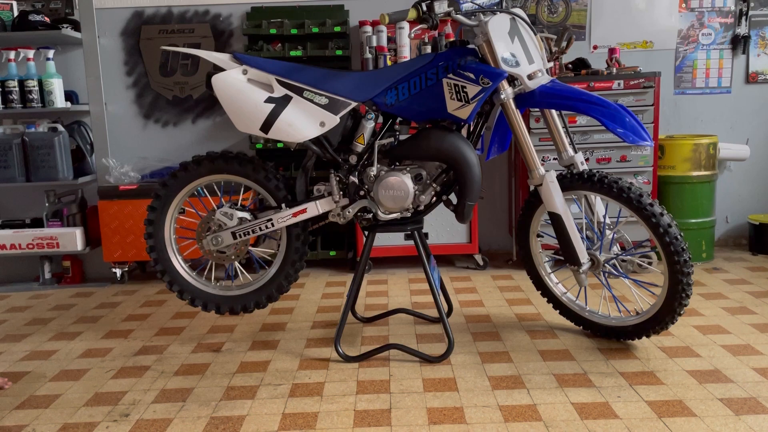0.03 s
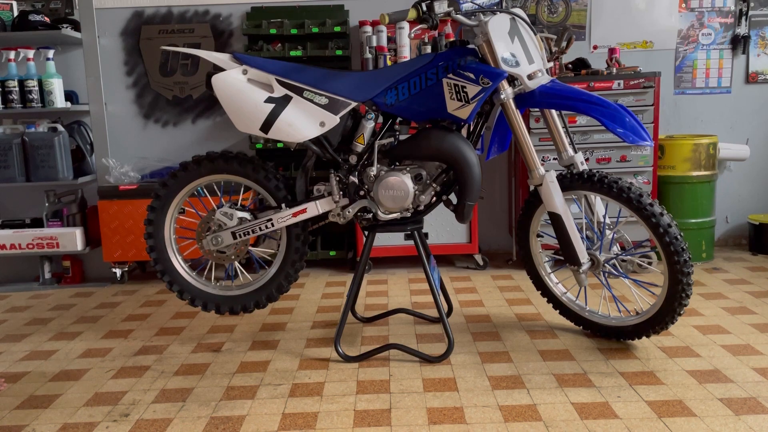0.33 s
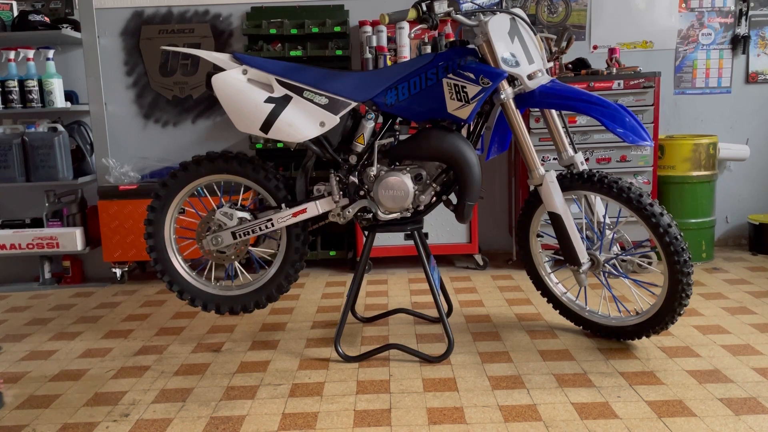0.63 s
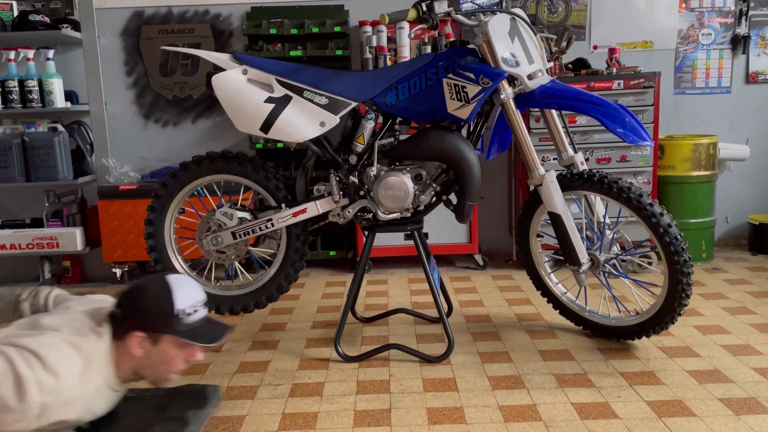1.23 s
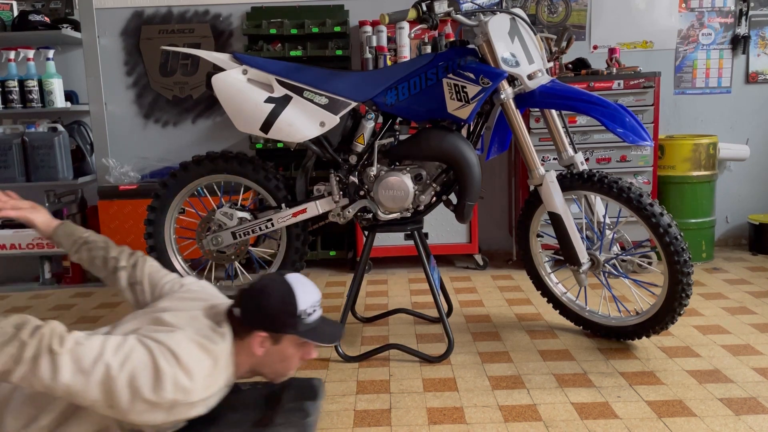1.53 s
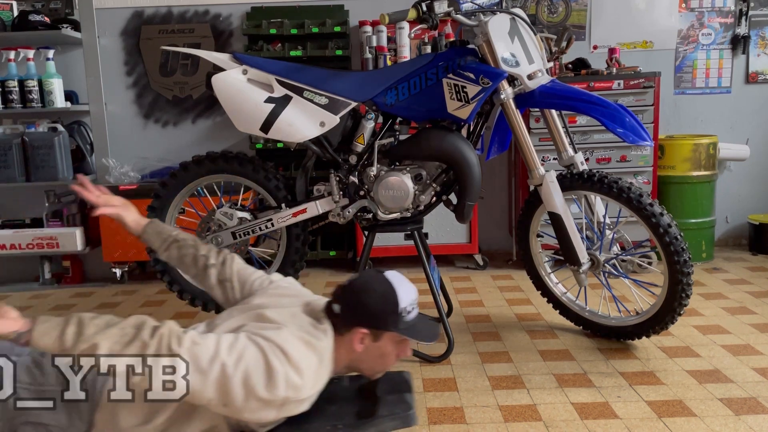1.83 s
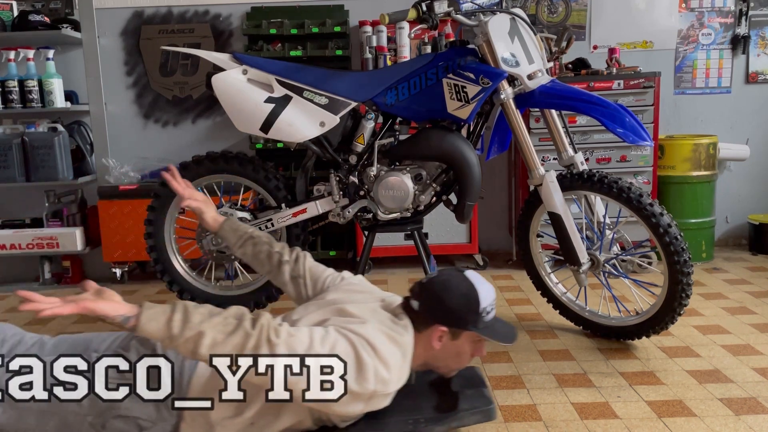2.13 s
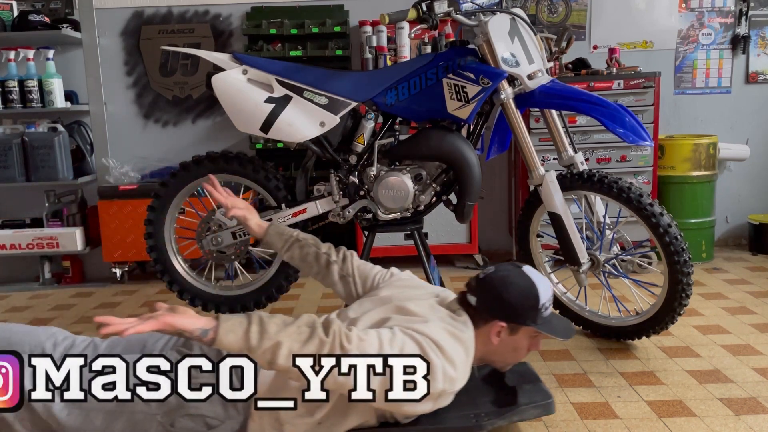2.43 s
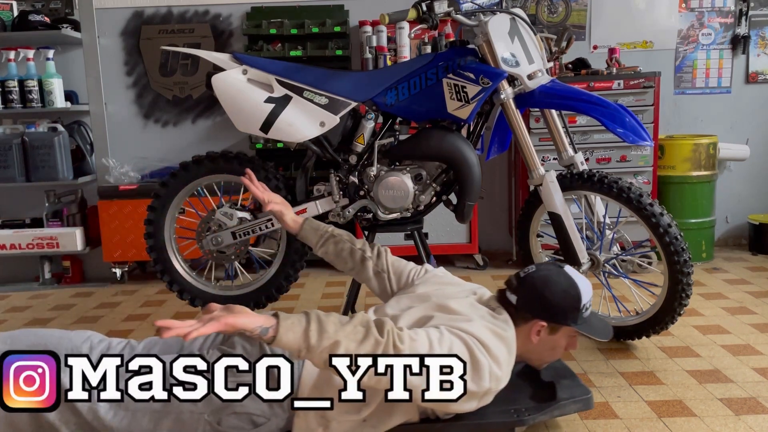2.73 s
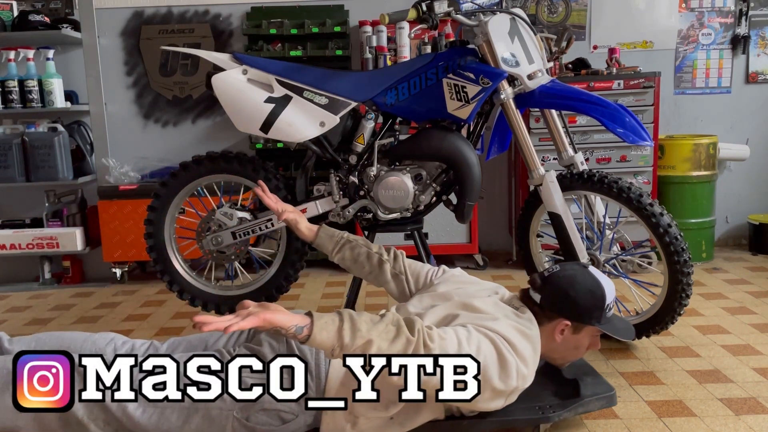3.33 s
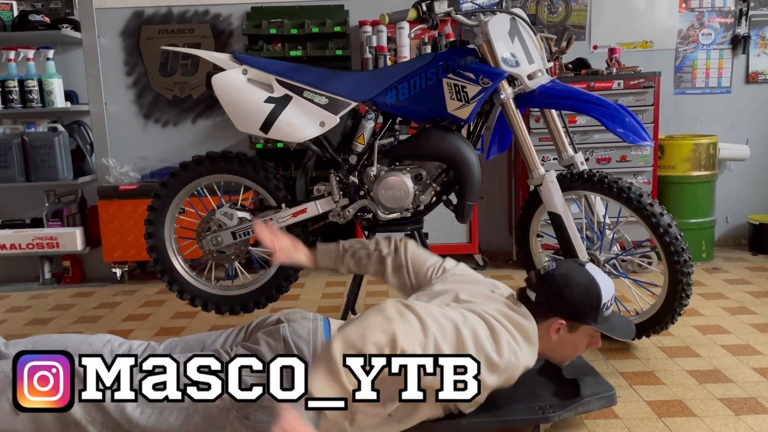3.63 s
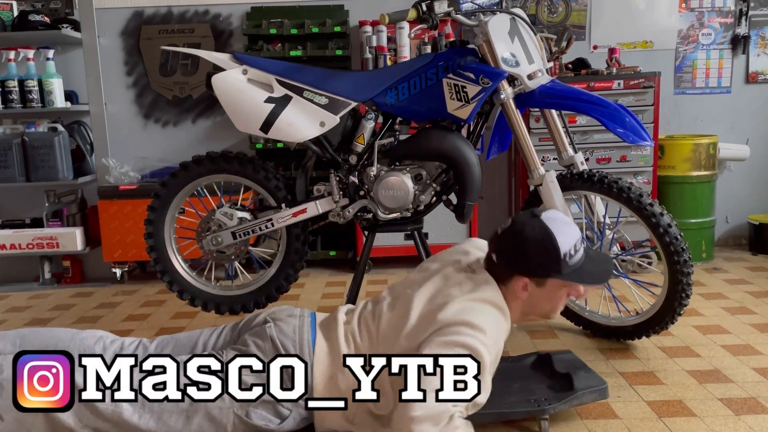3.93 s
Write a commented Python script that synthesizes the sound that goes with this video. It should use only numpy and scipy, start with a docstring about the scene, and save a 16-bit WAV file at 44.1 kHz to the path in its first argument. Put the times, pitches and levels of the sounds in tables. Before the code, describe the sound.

Small wheels rumble across a tiled garage floor, clicking and coasting to a stop.

```python
"""Small wheels rumble over a tiled garage floor: a mechanic's creeper, pushed off, coasts to a stop.
Floor roughness shakes the board, grit crackles and tile joints knock the wheels.
Loose casters tick, their bearings sizzle and the frame clinks.
Clothes rustle at the push, and again as the rider slaps a hand down on the floor."""
import sys
import numpy as np
from scipy import signal
from scipy.fft import rfft, irfft
from scipy.io import wavfile

SR = 44100
rng = np.random.default_rng(int(sys.argv[2]) if len(sys.argv) > 2 else 0)


def to_wav(sig):
    """Store sig (one row per channel, or 1-D mono) as 16-bit WAV at the path in sys.argv[1].

    Samples outside -1..1 are clipped; the rate is SR.
    """
    pcm = np.clip(np.atleast_2d(sig), -1, 1) * 32767
    pcm = np.round(pcm).astype(np.int16)
    wavfile.write(sys.argv[1], SR, pcm.T)  # frames by channels


N = 176400


def wheels():
    """Floor roughness shakes the board, which rings hollow under the push; grit crackles above."""
    roll_levels = [(0.15,-77,-85),(0.3,-61.5,-66),(0.375,-58,-66),(0.45,-41.5,-60.5),(0.53,-44,-61),(0.65,-33,-51.5),(0.85,-29.5,-42),(0.93,-29,-45),(1.03,-29.5,-42.5),(1.17,-30,-45.5),(1.33,-32,-47.5),(1.42,-32.5,-48.5),(1.62,-34,-49.5),(2.1,-40.5,-57.5),(2.39,-46.5,-63.5),(2.46,-46,-64),(2.56,-49.5,-63),(2.78,-57.5,-73),(2.94,-61.5,-76.5),(3.05,-74,-87),(3.2,-74,-95)]  # time_s, rumble_db, grit_db
    push_spectrum = [(40,-30),(75,-22),(105,-2.5),(135,1),(162,-12),(192,-2),(260,-4),(370,-2),(450,-1.5),(640,-6.5),(760,-3.5),(1000,-13),(1500,-21.5),(2200,-41.5),(3500,-96.5)]  # freq_hz, gain_db
    coast_spectrum = [(40,-26),(62,-7.5),(85,-6),(120,-2),(165,-6.5),(245,-6.5),(325,0.5),(440,-6),(520,0),(640,-2.5),(780,-3),(950,-10),(1220,-14),(1550,-26.5),(2200,-65),(3500,-87.5)]  # freq_hz, gain_db
    grit_spectrum = [(700,-13),(1300,-2),(2000,3),(2900,-3),(3800,-8.5),(5000,-13.5),(6300,-19),(8000,-15.5),(10000,-19.5),(13000,-27.5),(16000,-27)]  # freq_hz, gain_db
    rumble_db, grit_db = curves(roll_levels)
    coast, = curves([(1.0, 0), (1.344, 1)])  # crossfade, push to coast
    bumps = grains(per_s=1100, spread_db=1.9, wash=.75)
    board = resonate(rng.standard_normal(N), hz=419, width_hz=172)
    pushed = unit(colour(bumps, push_spectrum) + amp(-4.5) * board)
    rumble = (1 - coast) * pushed + coast * colour(bumps, coast_spectrum)
    crunch = grains(per_s=2000, spread_db=2.5, wash=.5)
    grit = colour(crunch, grit_spectrum) * flutter(rate_hz=18, depth_db=1.54)
    moving, = curves([(3.1, 0.99), (3.3, 0)])
    uneven = flutter(rate_hz=13, depth_db=.6)
    return moving * uneven * (amp(rumble_db + 0.02) * rumble + amp(grit_db - 0.63) * grit)


def joints():
    """Each tile joint knocks the board; a sharp edge also makes the hard wheel clack."""
    crossings = [(0.858,-22,-18),(0.901,-21,-20),(0.964,-20.5,-17),(1.038,-22,3),(1.297,-28,-13),(1.326,-20.5,-1),(1.339,-23,-11),(1.769,-27,-7),(2.102,-32,-9),(2.46,-30,-25),(2.927,-47,-18)]  # start_s, peak_db, clack_re_knock_db
    board_modes = [(131,-21,0.025),(452,12.5,0.0072),(760,-1,0.0087)]  # freq_hz, level_db, t60_s
    wheel_modes = [(1200,1.5,0.009),(1456,-2,0.0056)]  # freq_hz, level_db, t60_s
    knock, clack = unit(ring(board_modes)), unit(ring(wheel_modes))
    rise_s = .0015
    rise = np.minimum(np.arange(len(knock)) / SR / rise_s, 1)
    out = np.zeros(N)
    for start_s, peak_db, clack_db in crossings:
        add(out, start_s, peaked(rise * (knock + amp(clack_db) * clack), peak_db))
    return out


def caster(ticks, modes, crack, chatter):
    """A loose caster knocks against its swivel and chatters briefly."""
    crack_spectrum = [(300,-25),(2500,2),(5000,-7),(8500,0),(10500,-17),(16000,-32)]  # freq_hz, gain_db
    out = np.zeros(N)
    for start_s, peak_db in ticks:
        contact = chatter * burst(t60_s=0.025)
        contact[0] = 1  # the knock
        metal = unit(signal.fftconvolve(contact, ring(modes))[:len(contact)])
        snap = colour(burst(t60_s=0.0067), crack_spectrum)
        add(out, start_s, peaked(metal + crack * snap, peak_db))
    return out


def casters():
    """One caster ticks under the push, a second while coasting."""
    first_ticks = [(0.806,-41),(0.831,-32),(0.858,-33),(0.9525,-29.5),(0.987,-34),(1.004,-33),(1.029,-30.5),(1.081,-38)]  # start_s, peak_db
    first_modes = [(4380,-6,0.0056),(6300,-1,0.007),(8400,0.5,0.0085)]  # freq_hz, level_db, t60_s
    second_ticks = [(1.421,-40),(1.529,-34),(1.621,-37),(1.730,-39),(1.892,-39),(1.939,-42),(1.964,-46),(2.001,-36),(2.026,-39),(2.039,-38),(2.081,-38),(2.113,-37),(2.137,-36.5),(2.210,-40),(2.306,-38),(2.358,-42),(2.374,-42.5),(2.601,-42.5)]  # start_s, peak_db
    second_modes = [(3110,10,0.015),(4700,11,0.014),(4950,7,.012),(7700,6,0.01),(8250,5,0.0092),(9200,-6,0.0092)]  # freq_hz, level_db, t60_s
    first = caster(first_ticks, first_modes, crack=0.19, chatter=0.13)
    return first + caster(second_ticks, second_modes, crack=0.46, chatter=0.03)


def bearings():
    """Balls chatter in their races and excite broad metal rings; the first bearing climbs in pitch."""
    first_track = [(.1,-100,8295),(.35,-79,8300),(.75,-61.5,8400.5),(1.0,-59,8532),(1.35,-59,8823),(1.75,-65,9150),(2.2,-78,9200),(2.9,-100,9204)]  # time_s, level_db, pitch_hz
    first_rings = [(1,720,-1),(1.36,1197,-15)]  # pitch_ratio, width_hz, level_db
    second_track = [(.1,-100),(.35,-66),(.75,-94),(1.0,-57.5),(1.35,-60.5),(1.75,-58),(2.12,-62),(2.5,-68.5),(2.85,-82.5),(3.05,-105)]  # time_s, level_db
    second_rings = [(2880,1050,3),(4570,950,-.3),(8040,1200,-9)]  # freq_hz, width_hz, level_db
    first_db, pitch_hz = curves(first_track)
    second_db, = curves(second_track)
    first_balls, second_balls = [grains(per_s=450, spread_db=3.2, wash=.45) for _ in range(2)]
    first = sum(amp(db) * resonate(first_balls, pitch_hz * ratio, width_hz)
                for ratio, width_hz, db in first_rings)
    second = sum(amp(db) * resonate(second_balls, hz, width_hz) for hz, width_hz, db in second_rings)
    return (amp(first_db) * first + amp(second_db) * second) * flutter(rate_hz=6.4, depth_db=2.16)


def clinks():
    """Sharp contacts in the frame: each short scrape rings one broad resonance."""
    contacts = [(1.04,-38,4540,.03),(1.226,-35,8200,.04),(2.319,-44.5,8000,.04),(2.638,-47.5,4400,0.05),(2.655,-52,7450,.06),(2.7203,-40.5,5800,0.012),(3.728,-46,4600,0.1)]  # start_s, peak_db, ring_hz, t60_s
    scrape_spectrum = [(200,-22.5),(2000,7),(4500,12),(9000,4.5),(13000,1),(16000,-12)]  # freq_hz, gain_db
    out = np.zeros(N)
    for start_s, peak_db, ring_hz, t60_s in contacts:
        contact = burst(t60_s)
        clink = resonate(contact, ring_hz, width_hz=960) + amp(3.5) * colour(contact, scrape_spectrum)
        add(out, start_s, peaked(clink, peak_db))
    return out


def hand():
    """A palm lands on the tiles: a slap with a brush of sleeve, then a thud."""
    slap_spectrum = [(100,8),(900,-3),(2500,-6),(9000,-1.5),(12000,-9),(16000,-7.5)]  # freq_hz, gain_db
    thud_spectrum = [(20,-13),(50,5.5),(120,12),(220,-10.5),(900,-8),(2500,-23.5),(12000,-48)]  # freq_hz, gain_db
    slap = colour(burst(t60_s=0.22), slap_spectrum)
    rise_s = 0.011
    slap *= np.minimum(.5 + .5 * np.arange(len(slap)) / SR / rise_s, 1)
    thud = colour(burst(t60_s=0.045), thud_spectrum)
    out = np.zeros(N)
    add(out, start_s=3.7995, sound=peaked(slap, db=-36.5))
    add(out, start_s=3.807, sound=peaked(thud, db=-33.5))
    return out


def rider():
    """Clothes rub, and the board shifts under the rider near the end."""
    rustle_levels = [(0,-72),(.11,-66.5),(.22,-65.5),(.39,-55.5),(.52,-60),(.58,-53.5),(.8,-59.5),(1.04,-51),(1.3,-62),(2.4,-76),(3.5,-78),(3.64,-69),(3.71,-68),(3.755,-55),(3.82,-50),(3.86,-60),(3.92,-66.5),(3.99,-57.5)]  # time_s, level_db
    cloth_spectrum = [(100,-11.5),(400,3.5),(1500,0),(3000,-4.5),(5500,-6),(8500,-4.5),(10000,-7),(11700,-15.5),(16000,-20)]  # freq_hz, gain_db
    shift_levels = [(3.55,-95),(3.71,-72),(3.755,-48),(3.79,-51),(3.815,-50),(3.85,-55),(3.93,-65),(3.955,-60),(3.976,-49.5),(4,-63)]  # time_s, level_db
    shift_spectrum = [(20,-20),(45,-0.5),(110,2),(175,-6),(330,-2),(490,-10),(800,-9),(1050,-12.5),(1400,-24.5),(2100,-31),(5500,-75)]  # freq_hz, gain_db
    rustle_gain = amp(curves(rustle_levels)[0]) * flutter(rate_hz=72, depth_db=1)
    rustle = colour(grains(per_s=4100, spread_db=3, wash=0.52), cloth_spectrum)
    shift = colour(grains(per_s=600, spread_db=3.5, wash=0.41), shift_spectrum)
    return rustle_gain * rustle + amp(curves(shift_levels)[0]) * shift


def swishes():
    """Quick, bright strokes of rubbing cloth."""
    strokes = [(.425,0.12,-60),(0.583,0.087,-53),(.695,0.095,-54),(3.758,0.032,-54.5)]  # centre_s, length_s, level_db
    swish_spectrum = [(1000,-17),(3500,-7.5),(8200,-.5),(9900,-0.5),(11500,-10),(13000,-11),(16000,-11)]  # freq_hz, gain_db
    envelope = sum(amp(db) * swell(centre_s, length_s) for centre_s, length_s, db in strokes)
    return envelope * colour(grains(per_s=2500, spread_db=0, wash=0.49), swish_spectrum)


def scuff():
    """A last scuff on the tiles: tiny slips excite broad resonances."""
    resonances = [(780,160,-2),(1600,430,1.5),(4100,1900,-5)]  # freq_hz, width_hz, level_db
    slips = grains(per_s=750, spread_db=1, wash=0.68)
    rub = unit(sum(amp(db) * resonate(slips, hz, width_hz) for hz, width_hz, db in resonances))
    return amp(-54) * swell(centre_s=3.985, length_s=.05) * rub


def garage(x, wet_db):
    """Adds dense reflections that die sooner in the treble, keeping the power."""
    room_decay = [(100,.4),(500,0.46),(2000,0.3),(8000,0.26),(16000,0.24)]  # freq_hz, t60_s
    size, density, predelay_s = SR // 2, .1, .004
    taps = rng.standard_normal(size) * (rng.random(size) < density)
    taps *= np.arange(size) > predelay_s * SR
    hz, t, bands = signal.stft(taps, SR, nperseg=256)
    decay = np.exp(-np.log(1000) * t / read(room_decay, hz)[:, None])
    tail = signal.istft(bands * decay, SR)[1]
    wet = signal.fftconvolve(x, tail / np.linalg.norm(tail))[:N]
    return (x + amp(wet_db) * wet) / np.sqrt(1 + amp(wet_db) ** 2)


def travelling(x, wet_db, patch_s=.14, count=8):
    """Reflections change as the board moves: a crossfade to the next set every patch_s."""
    place = np.arange(N) / SR / patch_s
    distances = [abs((place + k) % count - count / 2) for k in range(count)]
    shares = [np.cos(np.pi / 2 * np.minimum(distance, 1)) for distance in distances]
    power = (sum(shares) ** 2 + amp(wet_db) ** 2) / (1 + amp(wet_db) ** 2)
    return sum(garage(x * share, wet_db) for share in shares) / np.sqrt(power)


def air():
    """Faint room noise over a slow sway below hearing."""
    air_spectrum = [(15,-30.5),(25,-2.5),(27,-16.5),(59,-15),(75,-29),(107,-29),(140,-44.5),(1450,-66),(1710,-67),(15500,-66.5)]  # freq_hz, gain_db
    sway_hz, width_hz, fade_s = 3, 1.2, .08
    hz, t = np.fft.rfftfreq(N, 1 / SR), np.arange(N) / SR
    sway = irfft(np.exp(2j * np.pi * rng.random(len(hz)) - ((hz - sway_hz) / width_hz) ** 2), N)
    fade = np.sin(np.pi / 2 * np.minimum(np.minimum(t, t[::-1]) / fade_s, 1))
    return amp(-54) * colour(rng.standard_normal(N), air_spectrum) + amp(-36) * fade * unit(sway)


def grains(per_s, spread_db, wash):
    """Random small impacts of uneven size over smooth noise."""
    size = amp(spread_db * np.minimum(rng.exponential(1, N), 4))
    hits = size * rng.choice([-1., 1.], N) * (rng.random(N) < per_s / SR)
    return unit(unit(hits) + wash * rng.standard_normal(N))


def burst(t60_s):
    """Decaying puff of noise."""
    t = np.arange(SR // 5) / SR
    return rng.standard_normal(len(t)) * np.exp(-np.log(1000) * t / t60_s)


def ring(modes):
    """Struck body: a few decaying modes."""
    t = np.arange(SR // 5) / SR
    return sum(amp(db) * np.exp(-np.log(1000) * t / t60_s) * np.sin(2 * np.pi * hz * t)
               for hz, db, t60_s in modes)


def resonate(x, hz, width_hz):
    """Steep resonance that can follow a pitch curve, at rms 1."""
    carrier = np.exp(2j * np.pi * np.cumsum(hz * np.ones(len(x))) / SR)
    pole = np.exp(-np.pi * width_hz / SR)
    return unit((carrier * signal.lfilter([1], [1, -2 * pole, pole * pole], x / carrier)).real)


def colour(x, spectrum, size=4096):
    """Minimum-phase filter with this spectrum; output at rms 1."""
    hz = abs(np.fft.fftfreq(size, 1 / SR))
    log_gain = np.log(amp(np.maximum(read(spectrum, hz), -100)))
    response = np.fft.ifft(np.exp(np.conj(signal.hilbert(log_gain)))).real[:size // 2]
    return unit(signal.oaconvolve(x, response)[:len(x)])


def flutter(rate_hz, depth_db):
    """Randomly wandering gain."""
    ratio = np.fft.rfftfreq(N, 1 / SR) / rate_hz
    wander = irfft(rfft(rng.standard_normal(N)) * ratio / (1 + ratio ** 4), N)
    return amp(depth_db * unit(wander))


def swell(centre_s, length_s):
    """Gaussian rise and fall."""
    return np.exp(-(2 * (np.arange(N) / SR - centre_s) / length_s) ** 2)


def curves(rows):
    """Each column of a time table, per sample."""
    time_s, *columns = np.transpose(rows)
    return [np.interp(np.arange(N) / SR, time_s, column) for column in columns]


def read(points, hz):
    """Interpolates on a log-frequency axis."""
    freq_hz, value = np.transpose(points)
    return np.interp(np.log(hz + 1), np.log(freq_hz + 1), value)


def add(mix, start_s, sound):
    """Mixes a sound in at start_s."""
    part = mix[max(round(start_s * SR), 0):][:len(sound)]
    part += sound[:len(part)]


def amp(db):
    """Decibels to gain."""
    return 10 ** (np.asarray(db) / 20)


def unit(x):
    """Scales to rms 1."""
    return x / np.sqrt(np.mean(x ** 2) + 1e-20)


def peaked(x, db):
    """Scales to a peak level."""
    return amp(db) * x / abs(x).max()


def scene():
    """Creeper and rider in the garage, mono."""
    metal = bearings() + casters() + clinks()
    mix = travelling(wheels() + joints(), wet_db=-4)
    mix += garage(metal, wet_db=-5)
    mix += garage(rider() + hand() + swishes() + scuff(), wet_db=-13.5)
    return (mix + air())[None]


def record(dry):
    """Steep low-pass at the top of the treble."""
    cutoff_hz = 15800
    lowpass = signal.firwin(767, cutoff_hz, window=("kaiser", 9), fs=SR)
    return signal.oaconvolve(dry, lowpass[None], "same")


dry = scene()
out = record(dry)
to_wav(out)
```